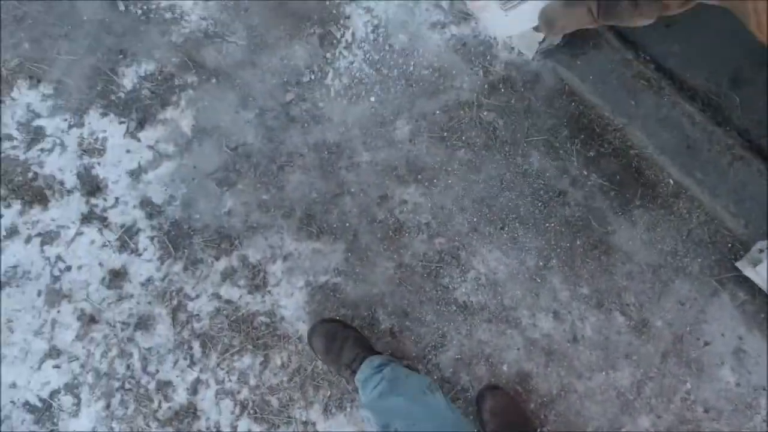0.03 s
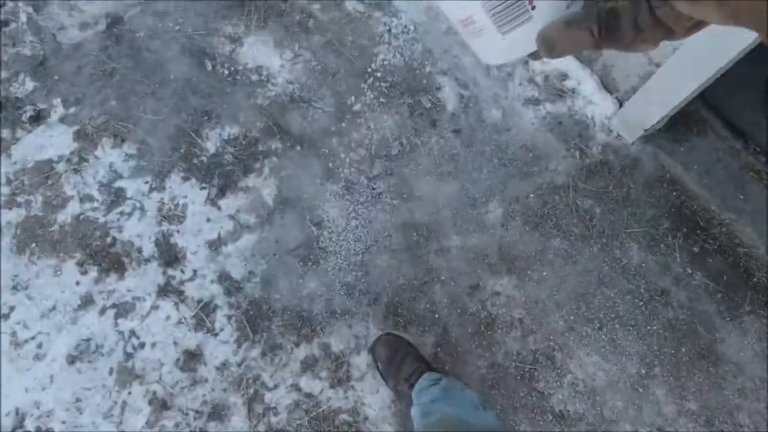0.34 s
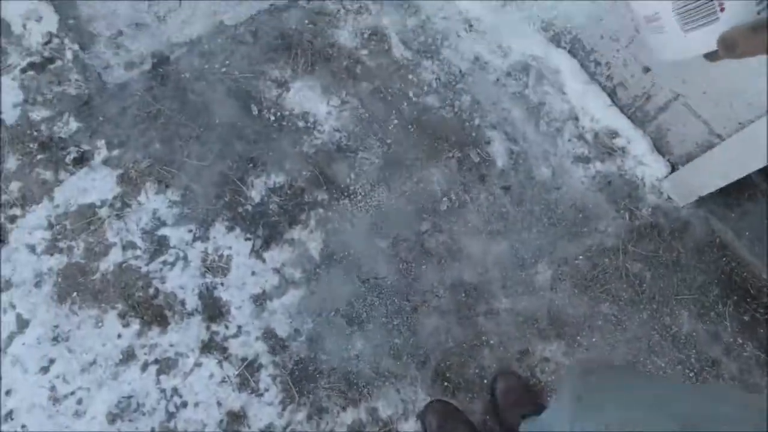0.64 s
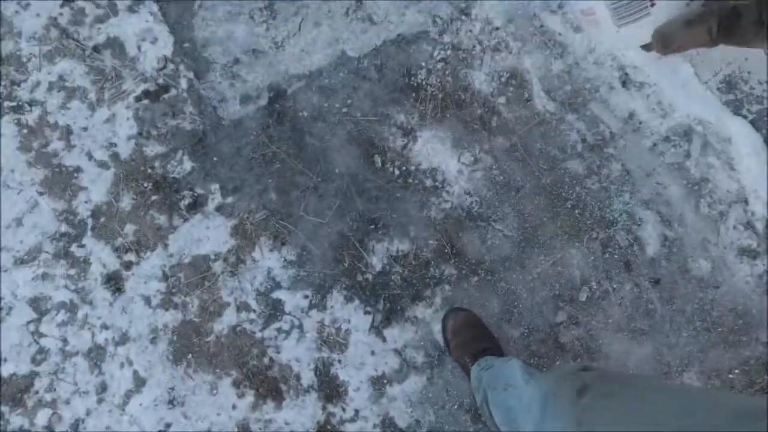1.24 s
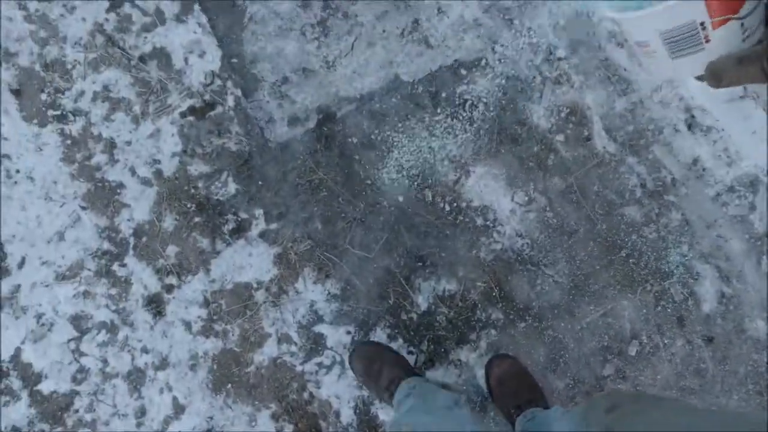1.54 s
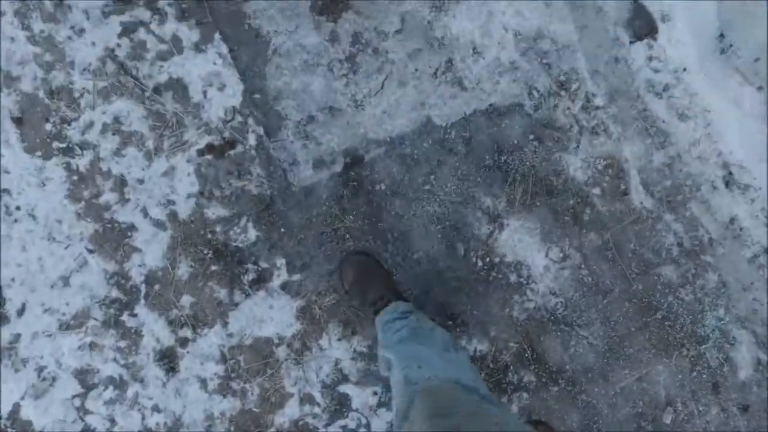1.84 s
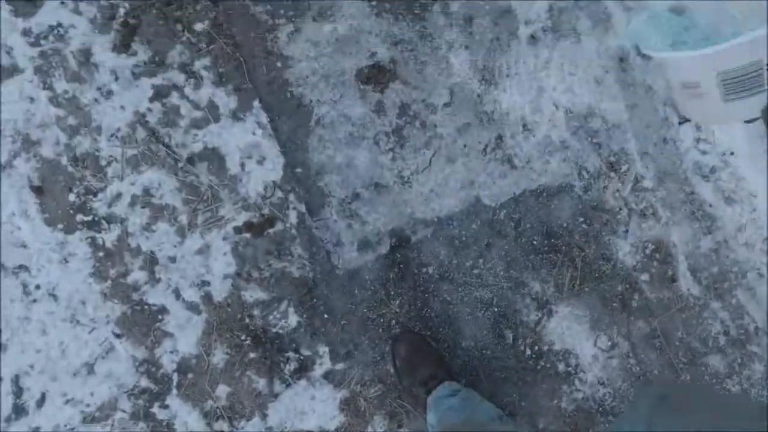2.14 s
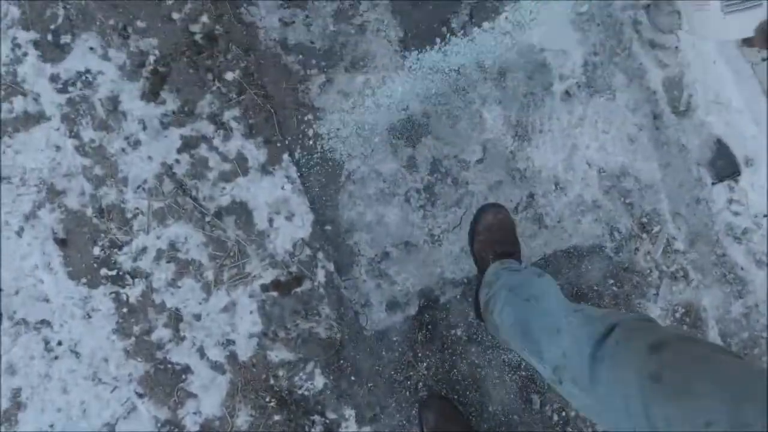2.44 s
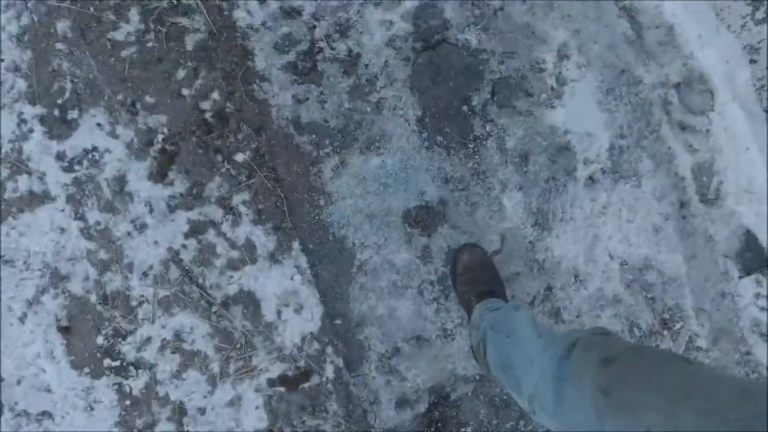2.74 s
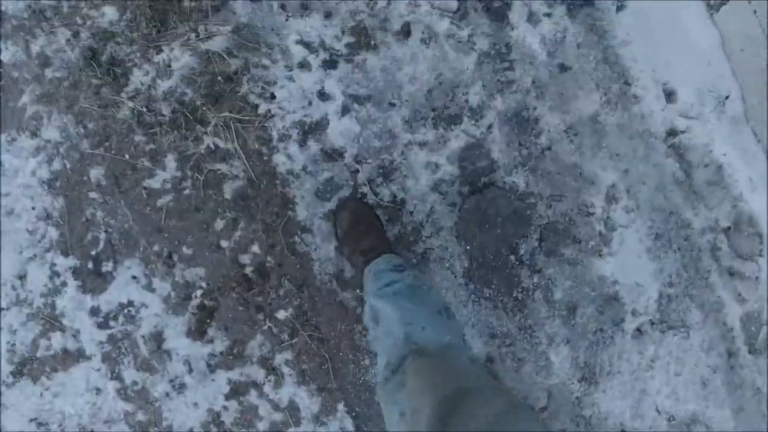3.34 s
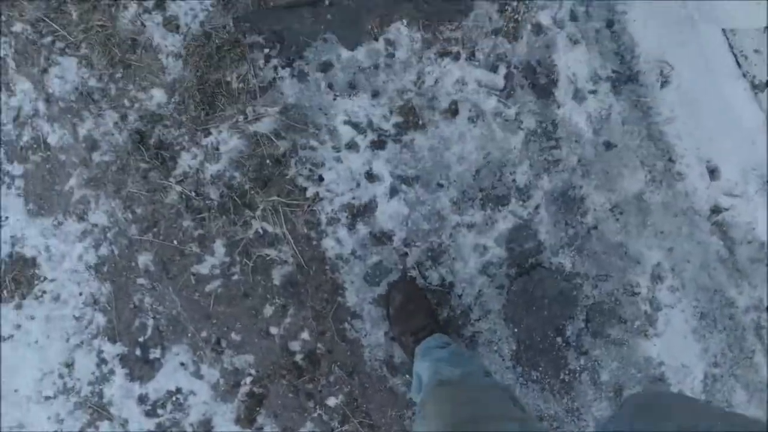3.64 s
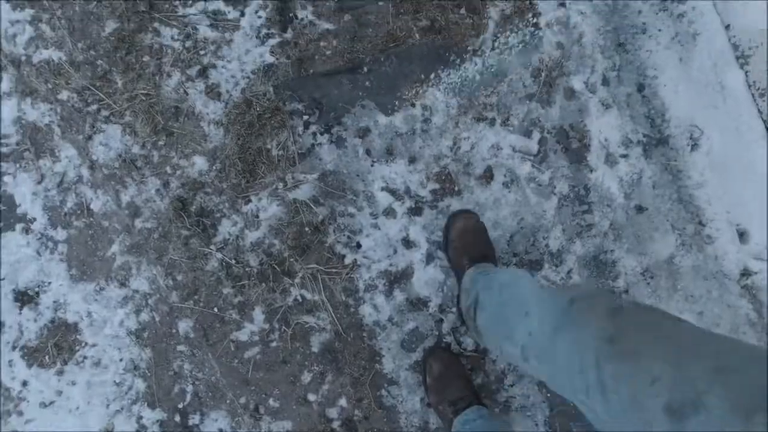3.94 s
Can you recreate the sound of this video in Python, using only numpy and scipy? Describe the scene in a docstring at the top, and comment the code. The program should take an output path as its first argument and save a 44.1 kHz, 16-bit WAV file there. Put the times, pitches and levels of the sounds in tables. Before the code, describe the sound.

Salt granules rattle in a plastic jug in quick shakes, a fine spray hissing over ice close by. Boots start to thud and crunch from about 0.5 seconds. The shaking pauses briefly after 1.5 seconds, then resumes with louder spray. Near 3 seconds the icy crust cracks hardest and salt skitters on; two more heel thumps follow around 3.6 seconds. Light wind touches the microphone throughout.

```python
"""A walker on icy ground shakes de-icing salt from a plastic jug held out to the right.
For 1.5 s, quick shakes rattle granules in the jug and a fine spray hisses over the ice; boots start
to thud, crunch and crack the crust. After a short pause the shakes resume with louder spray.
Near 3 s the crust cracks hardest and salt skitters on; two more heel strikes follow near 3.6 s.
Throughout, light wind touches the walker's two closely spaced microphones."""
import sys
import numpy as np
from scipy import signal
from scipy.fft import rfft, irfft
from scipy.io import wavfile

SR = 44100
rng = np.random.default_rng(int(sys.argv[2]) if len(sys.argv) > 2 else 0)


def unload_wav(signal):
    """Save mono or channel-first audio to the path in sys.argv[1] as 16-bit WAV at rate SR, clipped to [-1, 1]."""
    wavfile.write(
        sys.argv[1],
        SR,
        np.round(np.clip(np.atleast_2d(signal).T, -1, 1) * 32767).astype(np.int16),
    )


N = 176400

# peak_s, length_s, rattle_db, spray_db
JUG_SHAKES = [(.01, 0.14, -49, -59), (0.104, 0.081, -38.5, -47), (0.206, 0.06, -37, -46.5),
              (0.301, 0.074, -40, -47), (0.434, 0.097, -45.5, -60), (0.555, 0.077, -42, -51),
              (0.653, 0.13, -54, -67.5), (0.831, 0.054, -55.5, -88), (0.948, 0.077, -47, -51.5),
              (1.051, 0.09, -49.5, -50), (1.173, 0.11, -49.5, -52.5), (1.314, 0.086, -42.5, -48.5),
              (1.432, 0.075, -41.5, -51.5), (1.529, 0.073, -40.5, -49), (1.849, 0.06, -47, -46),
              (1.959, 0.11, -44, -42.5), (2.096, 0.071, -46, -45.5), (2.213, 0.069, -54, -44),
              (2.315, 0.087, -40, -37.5), (2.442, 0.073, -45.5, -43.5), (2.528, 0.042, -42.5, -38.5),
              (2.777, 0.055, -42, -37), (2.856, 0.09, -57, -45.5), (2.956, 0.07, -68, -39.5),
              (3.035, 0.092, -46.5, -42.5), (3.128, 0.043, -47.5, -42.5), (3.247, 0.065, -50, -48.5),
              (3.335, 0.074, -48, -45.5), (3.474, 0.077, -42, -43), (3.566, 0.076, -47, -42),
              (3.681, 0.096, -52.5, -41.5), (3.796, 0.087, -47, -43), (3.937, 0.063, -48.5, -48.5)]
# peak_s, length_s, level_db
CRUST_CRUNCHES = [(.53, 0.26, -56), (.96, 0.032, -52), (1.175, 0.078, -45.5), (1.428, 0.047, -45.5),
                  (1.93, 0.078, -51.5), (2.045, 0.091, -46), (2.133, 0.0151, -39.5), (2.742, 0.062, -39),
                  (2.82, 0.17, -40), (2.94, 0.078, -50), (3.1, 0.56, -56), (3.35, 0.036, -44),
                  (3.47, 0.087, -42), (3.58, 0.16, -41.5), (3.685, 0.04, -38.5)]
SOLE_TREADS = [(.36, 0.05, -55.5), (1.158, 0.029, -44), (1.35, 0.028, -54.5), (1.797, 0.043, -55.5),
               (2.045, 0.045, -44.5), (2.135, 0.018, -42), (2.75, 0.072, -44.5), (2.87, 0.26, -59),
               (3.54, 0.12, -48), (3.66, 0.038, -47.5)]
WIND_GUSTS = [(.15, 0.49, -60), (.49, 0.033, -45), (1.08, 0.72, -50.5), (1.95, 0.41, -53), (3.7, 1, -56.5)]
# start_s, peak_db, pitch_hz
GRANULE_KNOCKS = [(0.069, -31.5, 2900), (0.0946, -24, 3020), (.098, -27, 3100), (.187, -34.5, 13900),
                  (0.208, -27, 2670), (1.308, -32, 3160), (1.447, -34.5, 3000), (1.844, -28.5, 2940),
                  (2.393, -31.5, 3360), (2.7698, -20, 4010)]
HEEL_STRIKES = [(1.148, -38, 324), (2.007, -28, 560), (3.555, -36.5, 337), (3.653, -27, 352)]
CRUST_CRACKS = [(0.521, -33, 1380), (.637, -33.5, 1210), (.962, -37, 866), (1.14, -35, 910),
                (1.163, -33.5, 620), (1.211, -33.5, 1630), (1.345, -29, 1190), (1.399, -27.5, 1290),
                (1.407, -31, 1260), (1.637, -35, 1470), (1.917, -36.5, 940), (2.055, -30.5, 750),
                (2.138, -27.5, 1410), (2.685, -41, 1460), (2.817, -29, 1340), (2.854, -26, 970),
                (2.892, -31, 1510), (2.9192, -18.5, 1260), (2.989, -21, 1250), (3.405, -32.5, 1390),
                (3.437, -29.5, 1310), (3.4643, -25.5, 1660), (3.552, -29, 774), (3.592, -31.5, 990),
                (3.683, -27.5, 1420), (3.7101, -24, 1260), (3.765, -27, 1350)]
# start_s, level_db
GRANULE_TICKS = [(.267, -33), (2.393, -36), (3.141, -33), (3.7471, -30)]
# freq_hz, relative_db
JUG_SPECTRUM = [(100, -50.5), (400, -19.5), (800, -34.5), (1500, -8), (2100, -9), (2600, -3.5), (3050, 2.5),
                (3550, -3.5), (4200, -10), (5300, -13), (7500, -21.5), (16000, -45)]
SPRAY_SPECTRUM = [(150, -8.5), (400, -7), (750, 3), (1500, -2.5), (3200, 6), (5000, 4), (7000, -5.5),
                  (8500, -5), (9900, 0.5), (12000, -7), (16000, -15.5)]
CRUST_SPECTRUM = [(130, -37.5), (250, -16), (540, -6), (900, -3), (1200, 0), (1800, -3.5), (2600, -6),
                  (3500, -10), (4300, -24), (16000, -27)]
SOLE_SPECTRUM = [(40, -9), (150, -41.5), (200, -1), (255, 3.5), (370, -7), (520, -2.5), (800, -8.5),
                 (5000, -62)]
WIND_SPECTRUM = [(28, 0), (50, 0), (100, -14), (2000, -61)]
AIR_SPECTRUM = [(150, 11.5), (400, -1.5), (3000, 6.5), (6000, -11), (16000, -32)]

JUG_LAG_S, SPRAY_LAG_S, BOOT_LAG_S = 70e-6, 110e-6, 25e-6  # left microphone behind right
CLUMP_DB, CLUMP_S = 1.0, .014  # salt leaves the jug in loose clumps
TIME_S = np.arange(N) / SR


def jug_rattle():
    """Granules hit the plastic wall at each shake."""
    power = swells([(peak_s, length_s, db) for peak_s, length_s, db, _ in JUG_SHAKES])
    power *= clumps(CLUMP_DB, CLUMP_S)
    hits = grains(power, rate_hz=3000, spread_db=2.5, lag_s=JUG_LAG_S, lag_spread_s=50e-6)
    return colour(hits, JUG_SPECTRUM)


def salt_spray(skitter_peak_s=2.97, skitter_length_s=.52, skitter_db=-54.5, tick_decay_s=.0013):
    """Fine salt lands and skitters; stray granules tick on bare ice."""
    power = swells([(peak_s, length_s, db) for peak_s, length_s, _, db in JUG_SHAKES])
    power *= clumps(CLUMP_DB, CLUMP_S)
    power += swells([(skitter_peak_s, skitter_length_s, skitter_db)])
    hits = grains(power, rate_hz=12000, spread_db=3, lag_s=SPRAY_LAG_S, lag_spread_s=30e-6)
    tick_fade = np.exp(-TIME_S[:SR // 20] / tick_decay_s)
    for start_s, db in GRANULE_TICKS:
        add(hits, undb(db) * rng.standard_normal(len(tick_fade)) * tick_fade, start_s, JUG_LAG_S)
    return colour(hits, SPRAY_SPECTRUM)


def granule_knocks(decay_s=.00083):
    """Large granules knock on jug or ice and ring briefly."""
    out = np.zeros((2, N))
    for start_s, db, hz in GRANULE_KNOCKS:
        add(out, undb(db) * ring(hz, decay_cycles=decay_s * hz, attack_s=.00038), start_s, JUG_LAG_S)
    return out


def crust_crunch():
    """The crust gives way under a boot in short fits."""
    power = swells(CRUST_CRUNCHES) * clumps(depth_db=3.2, span_s=.003)
    hits = grains(power, rate_hz=3000, spread_db=3, lag_s=BOOT_LAG_S, lag_spread_s=40e-6)
    return colour(hits, CRUST_SPECTRUM)


def crust_cracks(crumble_db=-13, crumble_decay_s=.0025):
    """Ice and salt snap under a sole, then crumble."""
    snaps, crumb_power = np.zeros((2, N)), np.zeros(N)
    for start_s, db, hz in CRUST_CRACKS:
        add(snaps, undb(db) * ring(hz, decay_cycles=.77, attack_s=.00038), start_s, BOOT_LAG_S)
        crumb_power += undb(db + crumble_db) ** 2 * decay(start_s, crumble_decay_s)
    crumbs = grains(crumb_power, rate_hz=9200, spread_db=6, lag_s=BOOT_LAG_S, lag_spread_s=30e-6)
    return snaps + colour(crumbs, CRUST_SPECTRUM)


def heel_strikes():
    """A heel lands with a damped thump of sinking pitch."""
    out = np.zeros((2, N))
    for start_s, db, hz in HEEL_STRIKES:
        add(out, undb(db) * ring(hz, decay_cycles=1.3, attack_s=.0018, sag=.3), start_s, BOOT_LAG_S)
    return out


def sole_thuds():
    """Weight comes down or rolls on a sole."""
    hits = grains(swells(SOLE_TREADS), rate_hz=2500, spread_db=2, lag_s=BOOT_LAG_S, lag_spread_s=0)
    return colour(hits, SOLE_SPECTRUM)


def near_echoes(x, count=4, echo_db=-12.5, min_s=.0002, max_s=.0016, pose_s=.04):
    """Direct sound plus echoes off ground, legs and jug; delays change with each pose."""
    out = x.copy()
    for centre_s in np.arange(101) * pose_s:
        span = np.flatnonzero(np.abs(TIME_S - centre_s) < pose_s)
        fade = np.cos(np.pi / 2 * (TIME_S[span] - centre_s) / pose_s)
        for k, delay_s in enumerate(rng.uniform(min_s, max_s, count)):
            delayed = x[:, np.maximum(span - int(SR * delay_s), 0)]
            out[:, span] += (-1) ** k * undb(echo_db) * fade * delayed
    return out / np.sqrt(1 + count * undb(echo_db) ** 2)


def yard_reverb(x, level_db=-14.5, t60_s=.34, predelay_s=.006, split_hz=1550):
    """Faint yard reflections; they differ between the microphones above split_hz."""
    t = TIME_S[:SR // 2]
    mid, side = rng.standard_normal((2, len(t)))
    side = signal.sosfilt(signal.butter(1, split_hz, "high", fs=SR, output="sos"), side)
    tail = np.array([mid + side, mid - side]) * undb(-60 * t / t60_s) * (t > predelay_s)
    tail /= np.linalg.norm(tail[0])
    return undb(level_db) * signal.fftconvolve(x, tail, axes=1)[:, :N]


def wind(floor_db=-73.5):
    """Gusts buffet each microphone separately."""
    envelope = np.sqrt(swells(WIND_GUSTS) + undb(floor_db) ** 2)
    return envelope * colour(rng.standard_normal((2, N)), WIND_SPECTRUM)


def outdoor_air(gain_db=-69):
    """Quiet steady background, mostly common to both channels."""
    noise = rng.standard_normal(N) + .5 * rng.standard_normal((2, N))
    return undb(gain_db) * colour(noise, AIR_SPECTRUM)


def undb(db):
    """Decibels to gain."""
    return 10 ** (np.asarray(db) / 20)


def decay(start_s, decay_s):
    """Exponential fall from 1; zero before start_s."""
    return (TIME_S > start_s) * np.exp(-np.abs(TIME_S - start_s) / decay_s)


def swells(rows, rise_share=.39, fall_share=.72, shape=2.09, settle_db=-14, settle_s=.053):
    """Summed power of quick rises, slower falls and settling tails."""
    power = np.zeros(N)
    for peak_s, length_s, db in rows:
        width_s = length_s * np.where(TIME_S < peak_s, rise_share, fall_share)
        swell = np.exp(-(np.abs(TIME_S - peak_s) / width_s) ** shape)
        tail = undb(settle_db) * decay(peak_s, settle_s)
        power += undb(db) ** 2 * (swell ** 2 + tail ** 2)
    return power


def clumps(depth_db, span_s):
    """Wandering power gain of bunched impacts; mean 1."""
    knots_s = np.arange(0, N / SR + span_s, span_s)
    wander = np.interp(TIME_S, knots_s, rng.standard_normal(len(knots_s)))
    gain = undb(depth_db * wander) ** 2
    return gain / gain.mean()


def grains(power, rate_hz, spread_db, lag_s, lag_spread_s):
    """Random impacts, each from its own direction; denser and harder with power, up to rate_hz."""
    chance = np.clip(rate_hz / SR * (power / power.max()) ** .25, 1e-9, 1)
    struck = rng.random(N) < chance
    size, direction = rng.standard_normal((2, N))
    strength = np.sign(rng.standard_normal(N)) * undb(spread_db * np.clip(size, -2, 2))
    right = struck * strength / strength.std() * np.sqrt(power / chance)
    lag_samples = np.rint((lag_s + lag_spread_s * direction) * SR).astype(int)
    left = np.bincount(np.clip(np.arange(N) + lag_samples, 0, N - 1), right, N)
    return np.array([left, right])


def ring(hz, decay_cycles, attack_s, sag=0):
    """Damped sine, peak 1; pitch sinks by the fraction sag."""
    t = TIME_S[:SR // 20]
    fade = np.exp(-t * hz / decay_cycles)
    phase = 2 * np.pi * np.cumsum(hz * (1 - sag * (1 - fade))) / SR
    y = np.sin(phase) * fade * (1 - np.exp(-t / attack_s))
    return y / np.abs(y).max()


def colour(x, spectrum, taps=8192):
    """Minimum-phase filter of unit power, shaped by a spectrum table."""
    hz, db = np.array(spectrum).T
    gain = undb(np.interp(np.log(np.fft.rfftfreq(taps, 1 / SR) + 1), np.log(hz), db))
    cepstrum = irfft(np.log(gain))
    cepstrum[1:taps // 2] *= 2
    cepstrum[taps // 2 + 1:] = 0
    response = irfft(np.exp(rfft(cepstrum)))
    return signal.fftconvolve(x, response[None] / np.linalg.norm(response), axes=1)[:, :N]


def add(out, y, start_s, lag_s):
    """Mix y into both channels, the left lag_s later."""
    for channel, arrival_s in zip(out, (start_s + lag_s, start_s)):
        i = max(int(arrival_s * SR), 0)
        channel[i:i + len(y)] += y[:max(N - i, 0)]


def scene():
    """Salt and boots in the yard, over wind and air."""
    salt = near_echoes(jug_rattle() + salt_spray()) + granule_knocks()
    boots = near_echoes(crust_crunch() + sole_thuds()) + heel_strikes() + crust_cracks()
    near = salt + boots
    return near + yard_reverb(near) + wind() + outdoor_air()


def record(dry):
    """Steep recorder low-pass."""
    cutoff_hz = 15700
    return signal.sosfilt(signal.ellip(10, .1, 80, cutoff_hz, fs=SR, output="sos"), dry)


dry = scene()
out = record(dry)
unload_wav(out)
```